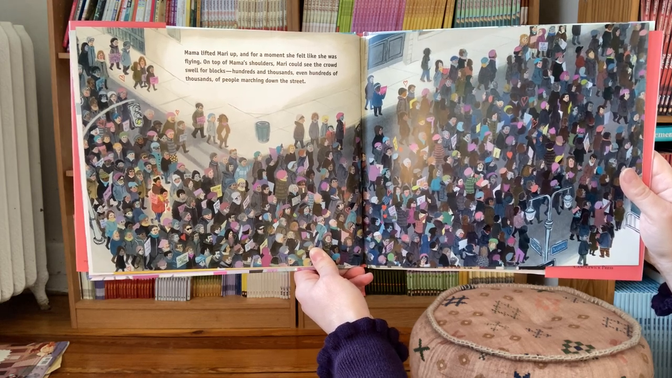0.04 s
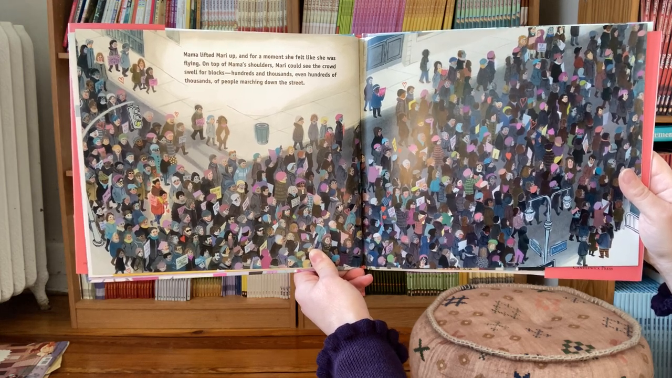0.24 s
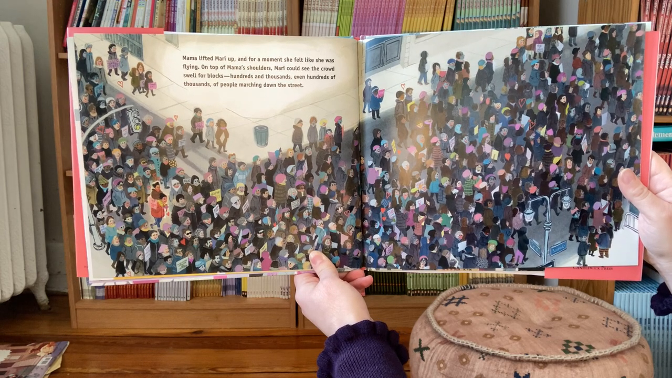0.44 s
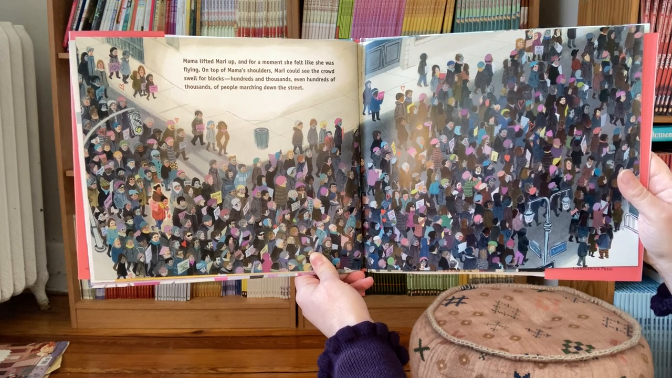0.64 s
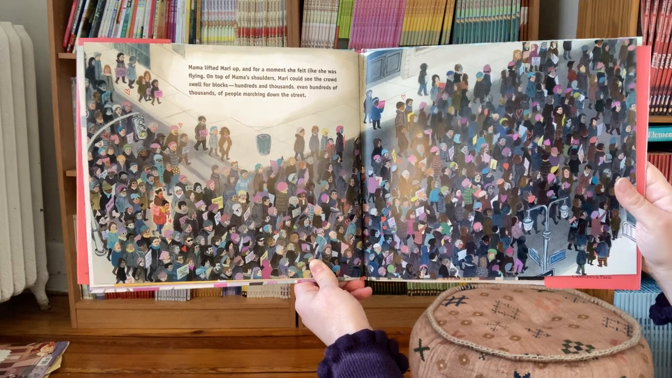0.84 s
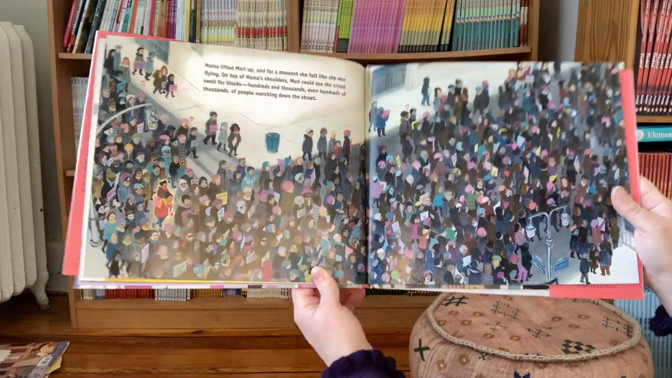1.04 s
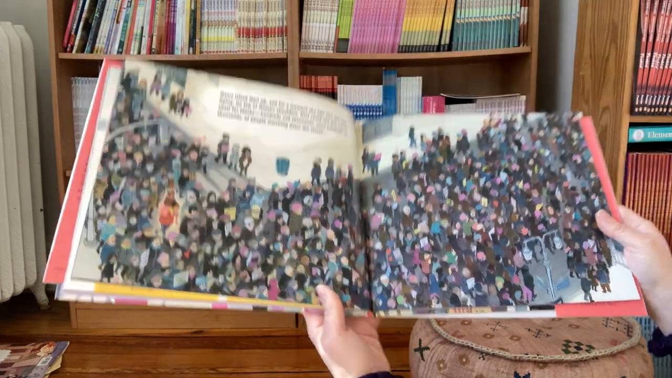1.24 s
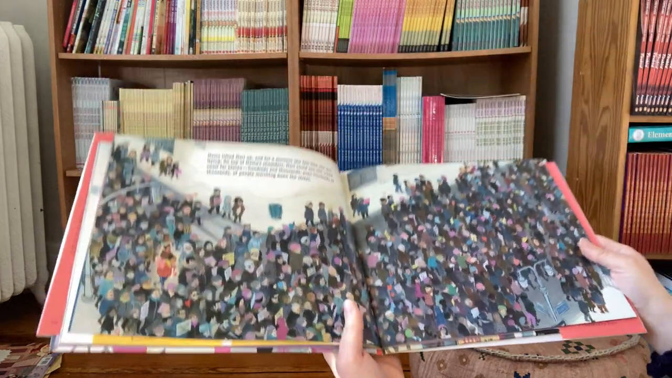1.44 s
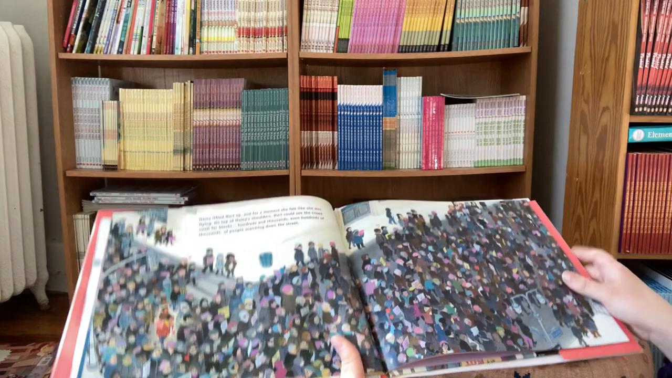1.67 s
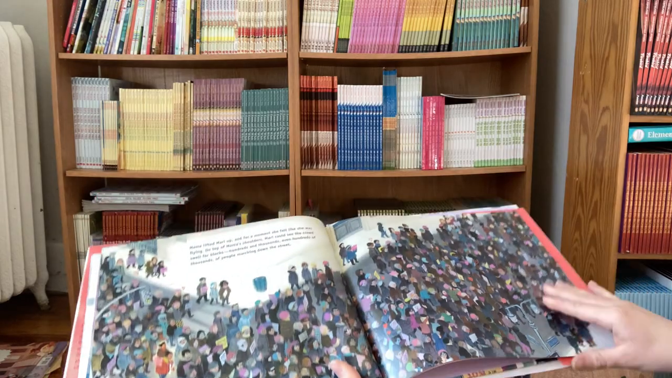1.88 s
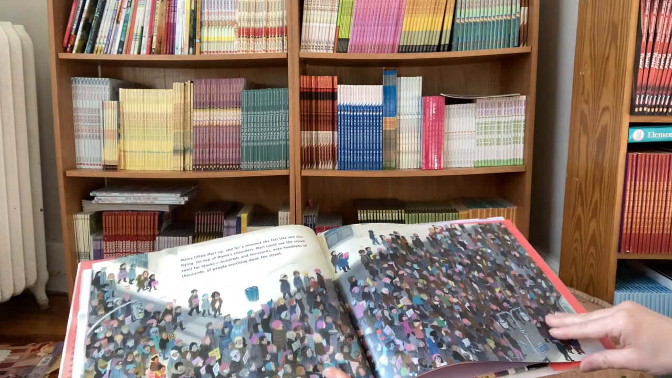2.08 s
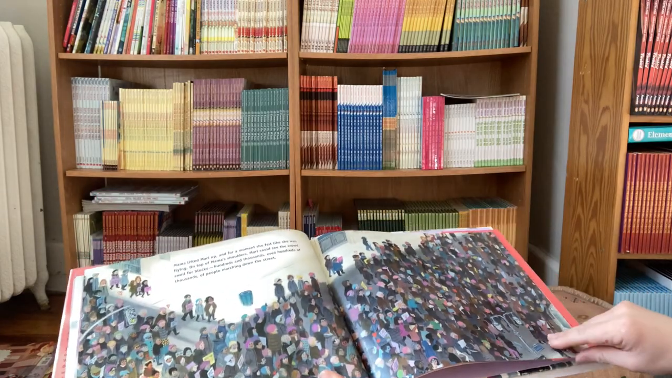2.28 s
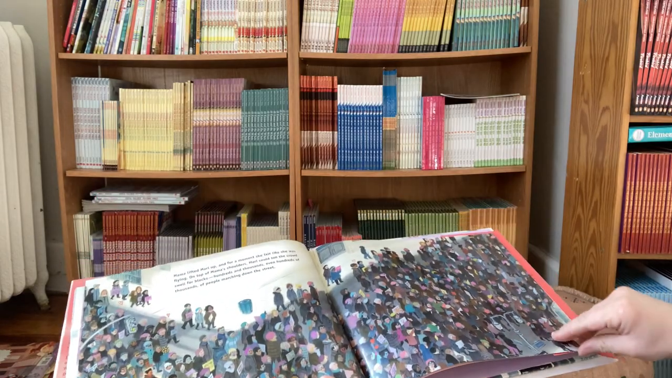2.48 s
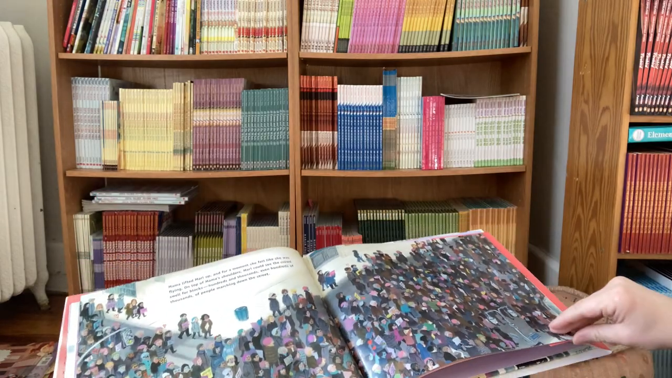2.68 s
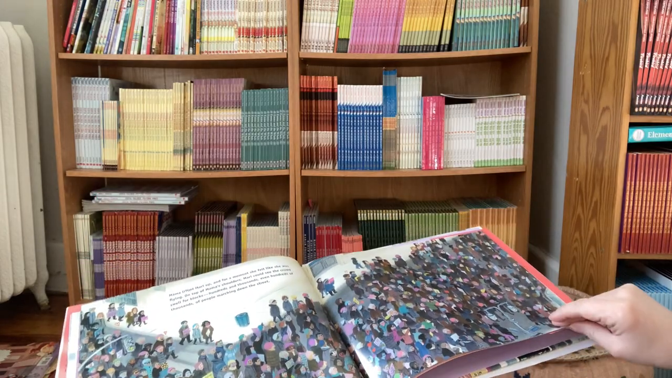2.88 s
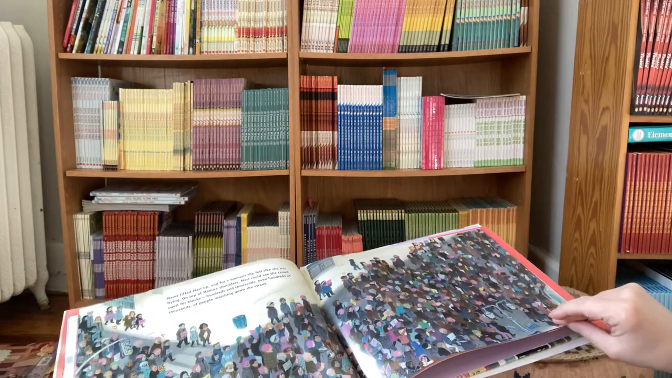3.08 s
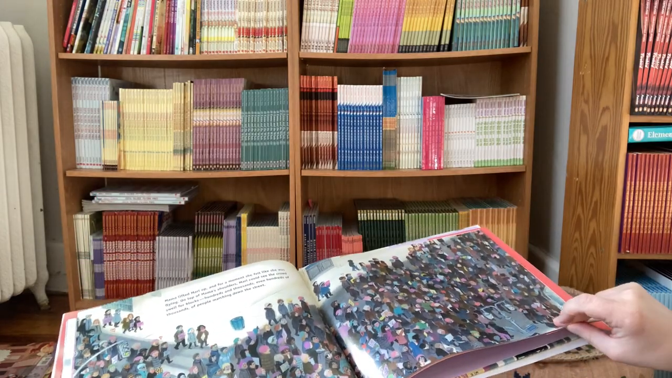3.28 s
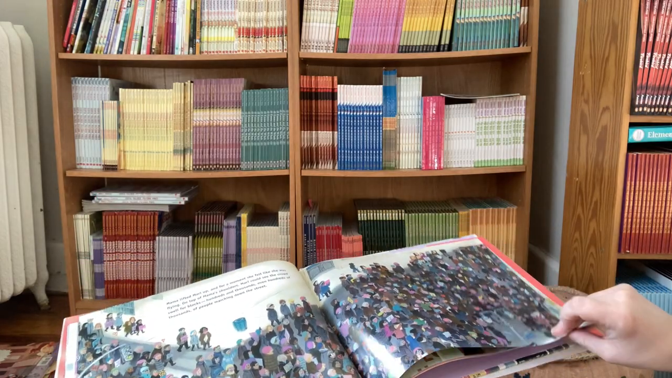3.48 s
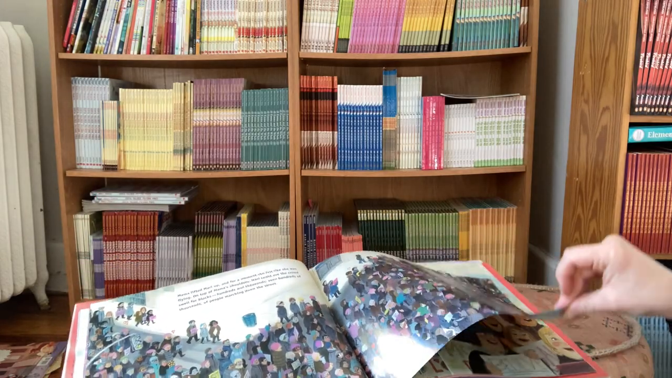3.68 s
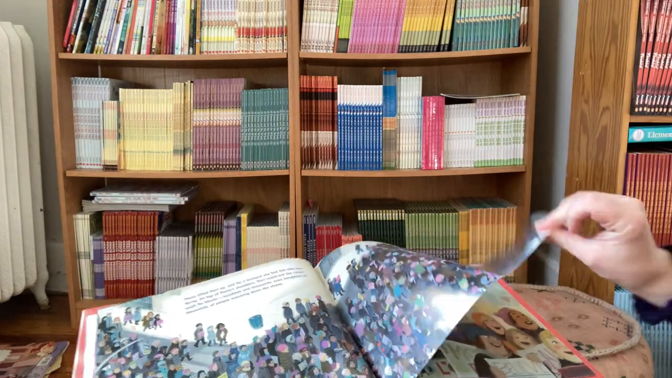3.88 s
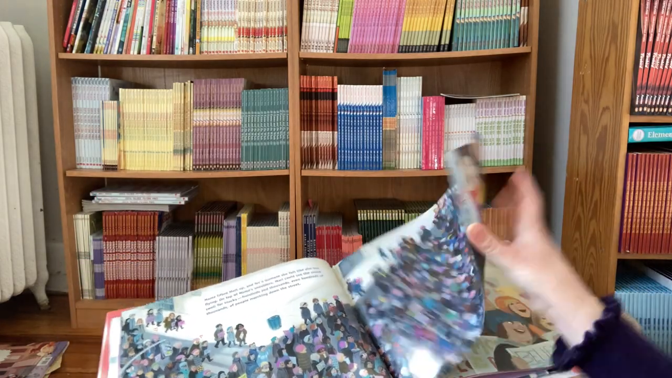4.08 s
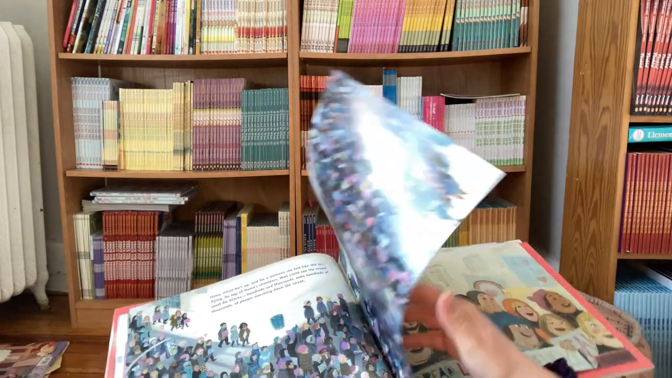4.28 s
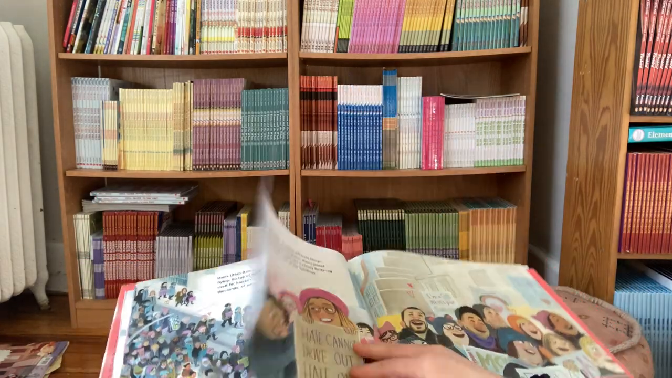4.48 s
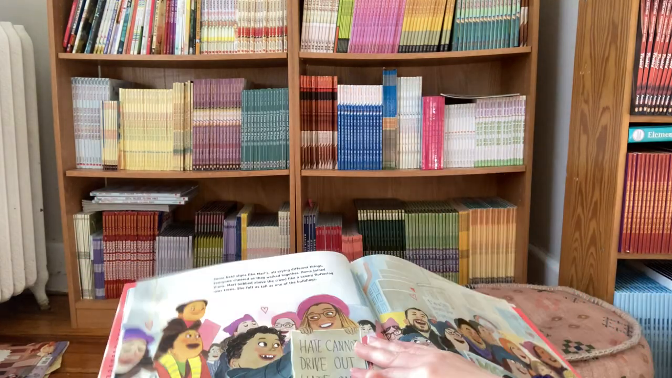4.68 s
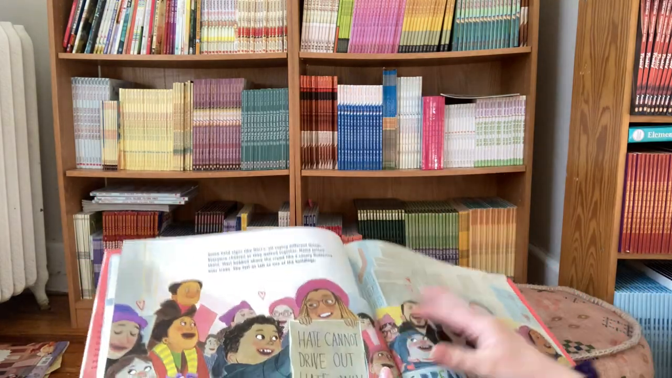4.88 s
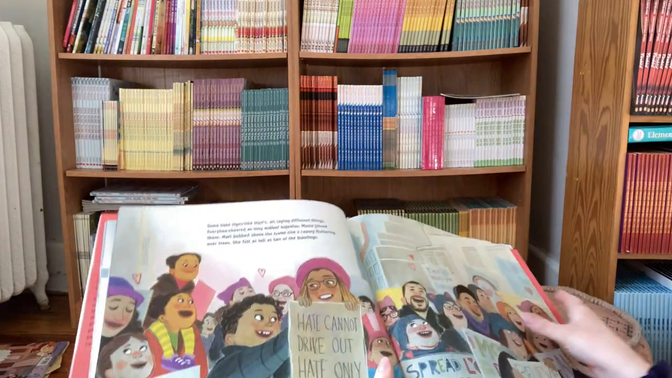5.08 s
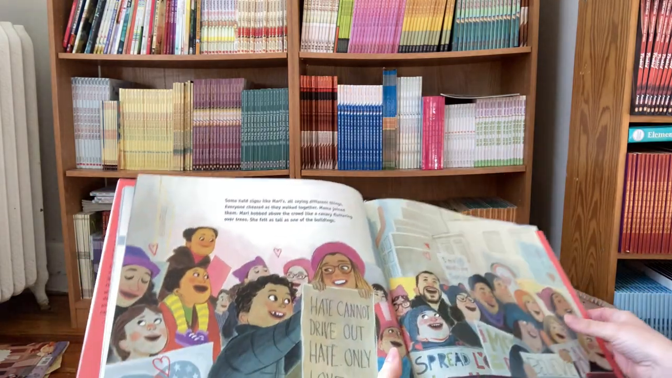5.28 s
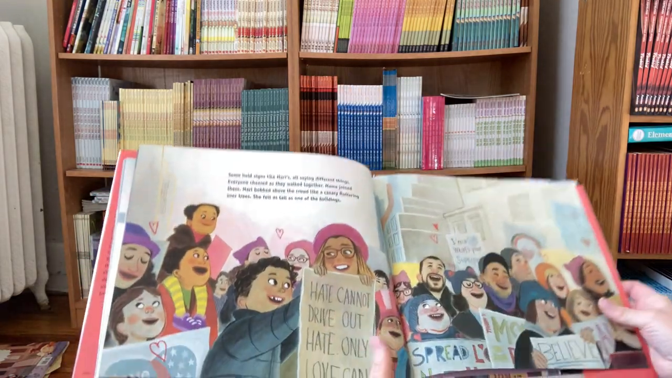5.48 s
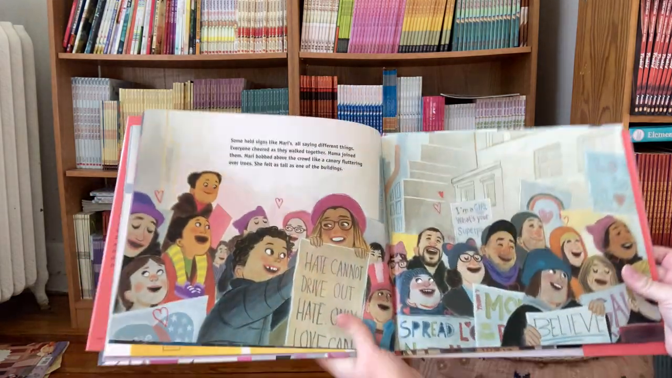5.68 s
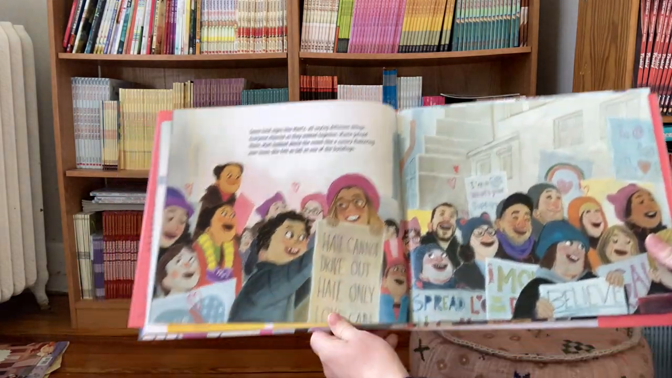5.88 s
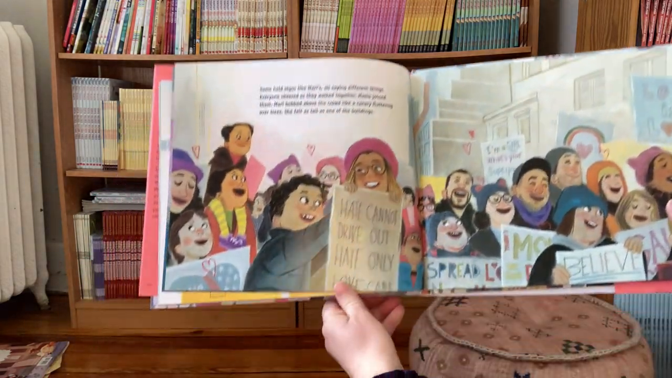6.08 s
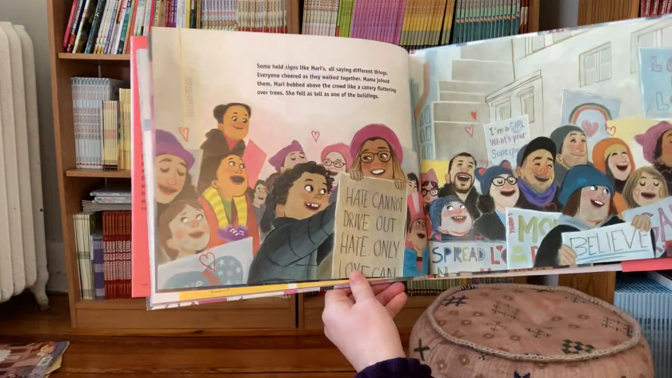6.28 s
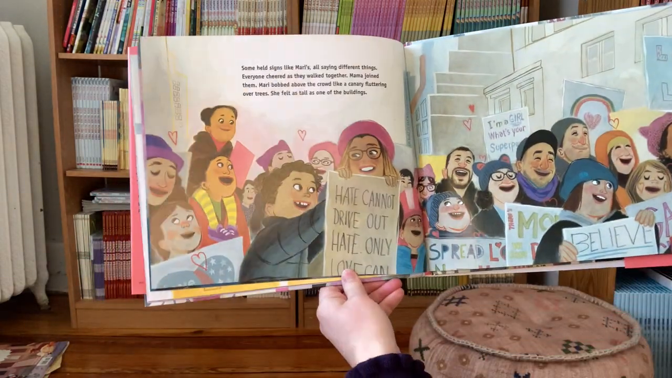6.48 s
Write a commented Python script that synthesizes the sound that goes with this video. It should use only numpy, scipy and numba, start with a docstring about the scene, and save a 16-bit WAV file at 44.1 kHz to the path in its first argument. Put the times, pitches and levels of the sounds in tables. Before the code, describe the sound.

A quiet small room with faint low rumble and slight hiss, close stereo pickup, short soft reverberation. Almost nothing until about 0.9 s, when hands brush paper and cover; small creases click and dull taps touch the board from 1.0 to 2.0 s. Around 2.2-2.4 s a few low-key papery pops and a pat, another pat near 2.6. From 2.9 to 3.3 s a fingertip runs along the page edge in a fine, quickening zip. A crackle at 3.4, then the stiff sheet lifts with pops from 3.7, growing to strong rustling and sharp hollow buckles at 4.0-4.26 s, the loudest around 4.22. A brief airy flutter ends in a crisp slap at 4.55 s. Soft sliding fades; from 5.4 small creaks gather, with a firm double knock on the cover at 5.75. Light brushing and tiny crackles continue to about 6.6 s.

```python
"""A stiff page of a large hardback picture book is turned: the sheet buckles, lands and rings.
Sheet and cover are excited resonators: kinks and slips drive moving band-passes, blows drive decaying modes.
Friction makes the hands' sliding, a quickening pulse train the page edge, and blows the knocks on the cover.
A small room adds time-varying diffuse echoes and a quiet rumble; the sound is stereo."""
import sys
import numpy as np
from scipy import signal
from scipy.fft import rfft, irfft, next_fast_len
from scipy.io import wavfile
from numba import njit

SR = 44100
rng = np.random.default_rng(int(sys.argv[2]) if len(sys.argv) > 2 else 0)


def output_pcm(signal):
    """Save a mono or channel-first signal as 16-bit PCM at the path in sys.argv[1].

    Samples are clipped to [-1, 1] before scaling.
    """
    pcm = np.clip(np.atleast_2d(signal).T, -1, 1) * 32767
    wavfile.write(sys.argv[1], SR, np.round(pcm).astype(np.int16))


N = 288105
T = np.arange(N) / SR


def undb(db):
    """Logarithmic level: decibels to amplitude gain."""
    return 10 ** (np.asarray(db) / 20)


def unit(x):
    """Power normalization: scale to rms 1."""
    return x / np.sqrt(np.mean(x ** 2))


def burst(x):
    """Energy normalization: the energy of a short sound, spread over 20 ms, has rms 1."""
    return x / np.sqrt(np.sum(x ** 2) / (.02 * SR))


def lookup(points, hz):
    """Logarithmic frequency axis: interpolate (frequency [Hz], value) points."""
    f, value = np.transpose(points)
    return np.interp(np.log(np.maximum(hz, 1)), np.log(f), value)


def colour(x, points):
    """Minimum-phase filtering: a causal response made from (frequency [Hz], level [dB]) points."""
    n = 2 * next_fast_len(x.shape[-1])
    level_db = lookup(points, np.fft.rfftfreq(n, 1 / SR))
    cepstrum = irfft(np.log(undb(level_db)))
    # folding the cepstrum onto positive time makes the filter causal
    cepstrum[1:n // 2] *= 2
    cepstrum[n // 2 + 1:] = 0
    response = np.exp(rfft(cepstrum))
    return irfft(rfft(x, n) * response)[..., :x.shape[-1]]


@njit
def resonate(x, hz, damping):
    """Resonance of a changing body: a state-variable band-pass whose centre moves."""
    y, band, low = np.empty(len(x)), 0., 0.
    for i in range(len(x)):
        g = np.tan(np.pi * min(hz[i] / SR, .45))
        v = (band + g * (x[i] - low)) / (1 + g * (g + damping))
        band, low, y[i] = 2 * v - band, low + 2 * g * v, damping * v
    return y


def modes(table, t):
    """Modal superposition: decaying (frequency [Hz], level [dB], t60 [s]) modes, detuned at every blow."""
    detune = 1 + .008 * rng.standard_normal(len(table))
    ring = 0
    for (hz, db, t60), factor in zip(table, detune):
        decay = np.exp(-np.log(1000) * t / t60)
        ring = ring + undb(db) * decay * np.sin(2 * np.pi * hz * factor * t)
    return ring


def walk(rate):
    """Slow random modulation: a wander of rms 1 through `rate` random knots per second."""
    knots = rng.standard_normal(int(N / SR * rate) + 2)
    return unit(np.interp(T * rate, np.arange(len(knots)), knots))


def slips(size, rate, spread_db):
    """Stick and slip of paper fibres: random clicks of uneven strength, `rate` per second on average."""
    chance, strength = rng.random(size), rng.standard_normal(size)
    push = rng.choice([-1, 1], size)
    return unit((chance < rate / SR) * push * undb(spread_db * np.clip(strength, -2, 2)))


def add(track, s, x):
    """Superposition: mix x into the track at time s."""
    i = int(s * SR)
    track[i:i + len(x)] += x[:N - i]


def diffuse(pair, apart_hz):
    """Diffuse-field coherence: two unrelated signals become channels alike in bass, different in treble."""
    mid, side = pair
    side = signal.sosfilt(signal.butter(1, apart_hz, "high", fs=SR, output="sos"), side)
    return np.array([mid + side, mid - side])


# spectrum of the quiet room: (frequency [Hz], level [dB])
QUIET_COLOUR = [(15, -60), (25, -21.5), (58, -2.5), (80, -1.5), (108, -11.5), (123, -8), (212, -22),
                (301, -18.5), (335, -19), (545, -27.5), (677, -30.5), (988, -34), (5730, -50), (8830, -44),
                (16000, -59.5)]
QUIET_DB = -66


def quiet_room():
    """Diffuse background noise: the low rumble of the house with a faint hiss, wandering in level."""
    air = diffuse(rng.standard_normal((2, N)), apart_hz=420)
    air = colour(air, QUIET_COLOUR)
    air = signal.sosfilt(signal.butter(6, 35, "high", fs=SR, output="sos"), air)
    return unit(air) * undb(QUIET_DB + .6 * walk(5))


# reverberation time of the room: (frequency [Hz], t60 [s])
ROOM_T60 = [(100, 0.69), (300, 0.55), (800, 0.38), (2000, 0.31), (5000, 0.3), (14000, 0.23)]
# spectrum of what the room returns: (frequency [Hz], level [dB])
ROOM_COLOUR = [(60, -1.5), (300, 2), (900, -1.5), (3500, 4.5), (6500, -0.5), (10000, -11.5), (15000, -18)]
NEW_PATHS_S = .22  # the book keeps moving, so its echoes take new paths this often


def room(x, early_db=-8.5, early_s=0.0045, tail_db=-6, left_db=-1.0, size=24000):
    """Reverberant decay: floor and shelves scatter the moving book's sound, which then dies away."""
    t, hop = np.arange(size) / SR, int(NEW_PATHS_S * SR)
    x, out = colour(x, ROOM_COLOUR), np.zeros((2, N))
    for centre in range(0, N + hop, hop):
        # late echoes: noise decaying at its own rate in each frequency band
        f, frame_s, cells = signal.stft(rng.standard_normal((2, size)), SR)
        decay = np.exp(-np.log(1000) * frame_s / lookup(ROOM_T60, f)[:, None])
        tail = signal.istft(cells * decay)[1][:, :size]
        tail = tail * np.clip((t - .004) / 0.0064, 0, 1)
        early = rng.standard_normal((2, size)) * np.exp(-t / early_s) * (t > .002)
        response = (undb(early_db) * unit(early) + undb(tail_db) * unit(tail)) / np.sqrt(2 * size)
        # crossfade from one set of paths to the next
        near = np.arange(max(centre - hop, 0), min(centre + hop, N))
        part = x[near] * np.cos(np.pi / 2 * (near - centre) / hop)
        for track, paths in zip(out, response):
            add(track, near[0] / SR, signal.fftconvolve(part, paths))
    return diffuse(out, apart_hz=298) * undb(np.array([[left_db], [-left_db]]) / 2)


MIRROR_S, MIRROR_DB, MIRROR_HZ = .00138, -17, (600, 2880)  # delay [s], gain [dB], band edges [Hz]


def mirrored(x):
    """Specular reflection: the sound and its delayed, band-limited bounce off the open book."""
    bounce = signal.sosfilt(signal.butter(1, MIRROR_HZ, "band", fs=SR, output="sos"), x)
    return x + undb(MIRROR_DB) * np.interp(T - MIRROR_S, T, bounce, left=0)


# phase by which the left port leads the right one: (frequency [Hz], phase [rad])
PORT_PHASE = [(20, 0.9), (150, 0), (400, -0.85), (1000, -0.95), (2000, -1), (3190, -2.5), (3790, -5),
              (4500, -6.5), (6500, -9.5), (8700, -6.5), (11500, -3), (13600, -0.3), (16000, 3)]


def ports(x, left_db=-4.0, shadow_hz=350):
    """Interchannel level and phase: above the bass the body leans right, each register with its own lag."""
    f = np.fft.rfftfreq(2 * N, 1 / SR)
    body = 1 / (1 + (f / 5900) ** 16)  # the lean vanishes in the high treble
    above_bass = f ** 2 / (f ** 2 + shadow_hz ** 2)
    lean = undb(left_db * body * above_bass / 2)
    lead = np.exp(1j * lookup(PORT_PHASE, f))
    return irfft(rfft(x, 2 * N) * np.array([lean * lead, 1 / lean]))[:, :N]


# fingers and spine knock on the cover: (time [s], level [dB], board ring [dB])
KNOCKS = [(1.086, -65.5, 0.5), (1.1321, -56, -5.5), (2.366, -53.5, -9), (2.594, -54.5, -8.5),
          (2.85, -63.5, -13), (2.871, -62.5, 3.5), (2.887, -61.5, 7), (3.167, -56.5, -45), (5.7418, -60, 1),
          (5.7515, -43, 5), (5.7633, -45, 4.5)]
# modes of the cover board: (frequency [Hz], level [dB], t60 [s])
BOARD = [(1363, 16, 0.0355), (1434, 9.5, 0.028), (3300, 3.5, 0.015), (3800, 11, 0.0081), (4170, 4.5, 0.014)]
# soft fingertip on the stack of pages: (frequency [Hz], level [dB])
PAD_COLOUR = [(200, 5.5), (500, 3), (900, 15.5), (1500, 2.5), (2400, -20), (4500, -22), (9000, -77)]
# hollow thump of the book: (frequency [Hz], level [dB])
THUMP_COLOUR = [(40, -2), (90, -5), (165, 3.5), (250, -11.5), (330, 0.5), (500, 1), (750, -17), (1400, -21)]
# dry crackle of paper, also in creases and buckles: (frequency [Hz], level [dB])
CRACKLE_COLOUR = [(600, -27), (1500, 9.5), (2500, 17), (4500, 8), (6500, 7), (9000, 2.5), (13000, -6),
                  (16000, -6.5)]
# tick and thump grow with the ring: level at 0 dB ring [dB], change per dB of ring [dB]
TICK_DB, TICK_PER_RING, THUMP_DB, THUMP_PER_RING = -10.5, 0.81, -7, 1


def knocks(tick_s=0.0012, pad_s=0.0078, size=6000):
    """Impact excitation: a dull pat on the pages rings the board, with a dry tick and the book's thump."""
    out, t = np.zeros(N), np.arange(size) / SR
    for s, db, ring_db in KNOCKS:
        tick_db = TICK_DB + TICK_PER_RING * ring_db
        thump_db = THUMP_DB + THUMP_PER_RING * ring_db
        ring = modes(BOARD, t)
        pat = colour(rng.standard_normal(size) * np.exp(-t / pad_s), PAD_COLOUR)
        tick = colour(rng.standard_normal(size) * np.exp(-t / tick_s), CRACKLE_COLOUR)
        thump = colour(signal.unit_impulse(size), THUMP_COLOUR)
        parts = burst(pat) + undb(ring_db) * burst(ring)
        parts += undb(tick_db) * burst(tick) + undb(thump_db) * burst(thump)
        add(out, s, undb(db) * parts)
    return out


# a fingertip runs along the edge of the page: (time [s], level [dB])
EDGE = [(2.86, -84), (2.89, -57), (2.925, -54), (2.985, -52.5), (3.005, -58), (3.025, -48), (3.115, -48),
        (3.19, -53), (3.3, -73.5)]
# spectrum of the edge's catches: (frequency [Hz], level [dB])
EDGE_COLOUR = [(500, -16), (900, 2), (1150, -6), (1500, 3), (2000, -3), (4800, -1), (7000, -5), (9500, -3),
               (12300, 6), (14500, 1), (15700, -8)]
EDGE_RATE, EDGE_DOUBLING_S = 85, 0.14  # first catches per second, time in which the rate doubles [s]


def page_edge(slip_s=0.0004, jitter=0.45, uneven_db=2):
    """Stick-slip oscillation: the cut edge zips in a quickening train of catches, each a spray of clicks."""
    start, end = EDGE[0][0], EDGE[-1][0]
    since = np.clip(T, start, end) - start
    rate = EDGE_RATE * 2 ** (since / EDGE_DOUBLING_S) * np.exp(jitter * walk(90))
    on = (T > start) & (T < end)
    # a catch falls at every whole cycle of the accumulated rate
    catches = np.diff(np.floor(np.cumsum(rate / SR)), prepend=0)
    # the faster the catches come, the less strain each one releases
    catches = catches * undb(uneven_db * rng.standard_normal(N)) / np.sqrt(rate)
    strain = signal.lfilter([1], [1, -np.exp(-1 / (slip_s * SR))], catches)
    spray = strain * rng.standard_normal(N)
    out = np.zeros(N)
    out[on] = unit(colour(spray[on], EDGE_COLOUR)) * undb(np.interp(T[on], *np.transpose(EDGE)))
    return out


# skin and paper slide over each other: (start [s], length [s], swell [s], rub level [dB],
# hiss level [dB], sheet level [dB], sheet pitch [Hz])
STROKES = [ (0.859, 0.2, 0.022, -81.5, -80.5, -91, 1610), (0.958, 0.19, 0.003, -71.5, -61, -73, 3020),
           (1.079, 0.23, 0.034, -71.5, -65, -67, 2460), (1.223, .17, 0.059, -74, -58.5, -63.5, 1490),
           (1.331, 0.21, 0.04, -73, -74, -71, 1500), (1.481, 0.25, 0.029, -69.5, -70.5, -74, 1280),
           (1.626, 0.16, 0.0041, -64, -62, -66, 3460), (1.826, 0.13, 0.003, -69, -62.5, -69.5, 3460),
           (1.899, 0.18, 0.078, -77, -65, -77, 3440), (1.997, 0.5, 0.046, -75.5, -75, -84, 1680),
           (2.464, 0.3, 0.031, -74, -79.5, -83, 1810), (2.697, 0.22, 0.087, -59.5, -69, -66, 1390),
           (2.872, 0.53, 0.02, -62, -62, -61.5, 1490), (3.385, 0.39, 0.0063, -61, -57, -55.5, 2250),
           (3.913, 0.36, 0.0017, -55, -52, -49.5, 1730), (4.122, 0.18, 0.0057, -39.5, -46, -48, 2610),
           (4.293, 0.29, 0.039, -60, -53.5, -56, 1860), (4.553, 0.18, 0.0075, -62, -64.5, -61.5, 2300),
           (4.66, 0.29, 0.16, -67.5, -56.5, -60.5, 2700), (4.904, 0.23, 0.0011, -73, -53, -69.5, 2950),
           (5.165, 0.72, 0.0046, -87, -73, -79, 4040), (5.38, 0.45, 0.11, -63.5, -63.5, -63.5, 1940),
           (5.631, 0.27, 0.052, -60, -55, -80, 1300), (5.781, 0.19, 0.08, -62, -56.5, -67, 2130),
           (5.997, 0.14, 0.02, -64.5, -59, -66, 2010), (6.096, 0.13, 0.051, -65.5, -54.5, -63, 2330),
           (6.166, 0.15, 0.032, -64, -59.5, -62, 3770), (6.198, 0.42, 0.034, -60.5, -73, -61.5, 2000)]
# rub heard through the book: (frequency [Hz], level [dB])
RUB_COLOUR = [(120, -34), (200, 2.5), (310, 4.5), (430, 0), (650, 1), (870, 7.5), (1170, 0.5), (1450, 4),
              (1780, -11.5), (2150, -1), (3220, -16.5), (4810, -14), (6860, -45.5), (8000, -35),
              (10400, -38.5), (17600, -120)]
# hiss of the paper's grain: (frequency [Hz], level [dB])
HISS_COLOUR = [(1500, -10), (3000, -11.5), (4800, -9), (6800, -2), (9000, 3), (13500, 1.5), (15500, -1)]
FADE_SHARE = 0.81  # the hand slows to rest over this share of each stroke
# the lighter the touch (more hiss than rub), the brighter the hiss:
# tilt at equal levels [dB per octave], its change per dB of lightness
HISS_TILT_DB, TILT_PER_LIGHTNESS = -7.5, 0.41
CREASES_PER_S, CREASE_DB = 110, -15  # creases ticking in a stroke: mean rate [1/s], level against the rub [dB]


def sliding(grip_db=1.1, body_db=1.5, wander=0.21):
    """Friction noise: stick and slip sounds through book and sheet; fine grain hisses and creases tick."""
    out = np.zeros(N)
    grip, bend = grip_db * walk(55), np.exp(wander * walk(12))
    creases = unit(colour(slips(N, rate=CREASES_PER_S, spread_db=11.5), CRACKLE_COLOUR))
    damping = .85
    for s, length, swell, rub_db, hiss_db, sheet_db, sheet_hz in STROKES:
        fade = FADE_SHARE * length
        tilt = HISS_TILT_DB + TILT_PER_LIGHTNESS * (hiss_db - rub_db)
        on = (T >= s) & (T < s + length)
        ramp = np.clip(np.minimum((T[on] - s) / swell, (s + length - T[on]) / fade), 0, 1)
        contact = np.sin(np.pi / 2 * ramp) ** 2
        catches = slips(SR, rate=1700, spread_db=4.5)[:on.sum()]
        grain = slips(SR, rate=8800, spread_db=4.5)[:on.sum()]
        # the sheet's broad resonance shifts as it bends under the hand
        pitch = sheet_hz * bend[on]
        sheet = resonate(resonate(catches, pitch, damping), pitch, damping)
        body = undb(body_db) * unit(colour(catches, RUB_COLOUR)) + undb(CREASE_DB) * creases[on]
        rub = undb(rub_db) * body + undb(sheet_db) * unit(sheet)
        tilted = [(f, db + tilt * np.log2(f)) for f, db in HISS_COLOUR]
        hiss = unit(colour(grain, tilted))
        # grip moves the hiss more than the rub
        add(out, s, contact * (rub * undb(grip[on]) + hiss * undb(hiss_db + 1.8 * grip[on])))
    return out


# the sheet buckles or a crease clicks: (time [s], level [dB], pitch [Hz], swell [s], fade [s],
# crackle [dB], resonance width / pitch [1])
BUCKLES = [ (1.0124, -55, 1020, 0.0003, 0.006, -8.5, 1.2), (1.231, -55, 1600, 0.0021, 0.006, -9, 1.7),
           (1.243, -53, 1220, .002, 0.014, -10.5, 0.57), (1.288, -58.5, 1390, .001, 0.035, -3.5, 0.85),
           (1.556, -67, 1200, .0005, 0.0034, -17, 0.88), (1.599, -75.5, 2000, .0004, 0.0011, 10.5, 1.6),
           (1.6328, -59.5, 3600, 0.00064, 0.0043, -12, 1.3), (1.637, -63, 895, 0.0013, 0.0025, -9, 1.4),
           (1.678, -63.5, 890, 0.0011, 0.017, -5, 0.98), (1.723, -64.5, 940, 0.00085, 0.007, -8, 1.3),
           (2.034, -64.5, 1370, 0.0003, .002, -9.5, 1.06), (2.226, -50.5, 1920, 0.003, 0.027, -20, 0.87),
           (2.246, -51.5, 1870, 0.0094, 0.021, -19.5, 1.74), (2.278, -47.5, 2100, .004, 0.013, -14, 1.58),
           (2.332, -52.5, 1240, 0.0017, 0.01, -19, 2.2), (2.347, -56.5, 1050, 0.0012, 0.004, -12, 0.8),
           (2.463, -77.5, 1860, .0005, 0.0025, -6, 2), (2.489, -68, 1490, 0.0011, 0.0053, -11, 2.3),
           (2.721, -69, 1800, .0004, .002, -3, 1.4), (2.737, -69.5, 1500, .0004, .002, -4, 1.2),
           (2.767, -63.5, 1490, .0004, .002, -4, 1.2), (2.791, -57.5, 910, 0.00074, 0.01, -11.5, 0.84),
           (2.804, -53.5, 746, 0.0022, 0.027, -30, 1.6), (3.379, -46.5, 1130, 0.0015, 0.013, 6, 1.74),
           (3.7011, -46.5, 910, 0.0004, 0.003, -7, 1.05), (3.7095, -46.5, 930, 0.00028, 0.0029, -7, 1.8),
           (3.716, -48, 945, 0.001, 0.04, -4, 1.25), (3.824, -42, 1470, .0008, .003, -26, 1.65),
           (3.83, -41, 1340, 0.0014, 0.01, -38, 1.54), (3.8447, -42.5, 1400, .002, 0.0036, -39.5, 1.6),
           (3.856, -43.5, 900, .003, .02, -19.5, 1.1), (3.916, -46.5, 1930, 0.00095, 0.0044, -3.5, 1.23),
           (3.9595, -45, 1280, 0.0005, 0.0043, -2.5, 1.5), (4.001, -46, 1730, 0.0073, 0.004, 0.5, 0.77),
           (4.0112, -36, 1950, 0.0013, 0.0025, -6, 0.73), (4.017, -37, 1700, 0.00061, 0.003, -4.5, 1.15),
           (4.021, -35, 1230, 0.003, 0.0061, -22, 0.72), (4.034, -42, 1210, 0.0011, 0.013, -17, 1.8),
           (4.103, -62, 3800, .0005, .003, -6, 1.3), (4.1316, -33.5, 1040, 0.00013, 0.0027, -11.5, 2.9),
           (4.1368, -36, 666, 0.00033, 0.0013, -13, 1.06), (4.148, -37, 2400, 0.01, 0.018, -2, 1.1),
           (4.216, -33, 1200, 0.0003, 0.003, -34, 1), (4.2229, -26.5, 1580, 0.0022, 0.002, -27.5, 0.68),
           (4.228, -28.5, 1448, 0.0008, 0.002, -32.5, 0.78), (4.2335, -34.5, 1040, .0005, .002, -30, 0.63),
           (4.2383, -29.5, 880, 0.0015, 0.004, -34.5, 0.88), (4.257, -39, 950, .001, .008, -27, 0.73),
           (5.469, -54, 1000, 0.00081, 0.0045, -33, 0.77), (5.477, -59, 1390, 0.0013, 0.0035, -16, 1.7),
           (5.527, -58.5, 1160, 0.0022, 0.0027, -8, 0.34), (5.535, -59.5, 800, 0.00029, 0.0013, -4.5, 1.4),
           (5.567, -56, 1150, .0008, 0.0021, -12, 0.3), (5.5758, -54, 1300, 0.00024, 0.00097, 1, 1.9),
           (5.582, -53.5, 1150, 0.00033, 0.0025, -1, 1.9), (5.652, -57.5, 1400, 0.00055, 0.0044, -14, 1.3),
           (5.684, -51.5, 1130, 0.012, 0.0035, -8, 0.26), (5.692, -47.5, 1250, 0.00034, 0.0037, -8.5, 0.39),
           (5.6989, -47.5, 1400, 0.001, 0.0044, -16, 0.51), (6.025, -60.5, 1110, 0.0083, 0.0087, -5, 0.56),
           (6.108, -58.5, 910, 0.0014, 0.0065, -4.5, 1.3), (6.216, -58, 1300, .001, 0.0065, 3.5, 2),
           (6.238, -56.5, 1300, 0.00092, 0.003, -1, 2.1)]
# air pumped by the sheet and thump of the whole book: (frequency [Hz], level [dB])
PUFF_COLOUR = [(40, -14.5), (100, -4.5), (170, -2), (230, -6), (315, 1.5), (450, -1), (700, -10),
               (1400, -50.5)]
# a wider fold sounds lower and pumps more air: puff level at 1 kHz [dB], its change with pitch
PUFF_DB, PUFF_DB_PER_OCTAVE = -10.5, -5.5


def buckles(glide=0.29, glide_s=0.0077, snap=2.1, rate=2600, size=14000):
    """Snap-through buckling: a kink's flurry of slips snaps, and the ring falls as the sheet relaxes."""
    out, t = np.zeros(N), np.arange(size) / SR - .06  # the snap falls at t = 0
    for s, db, hz, swell, fade, crackle_db, width in BUCKLES:
        strain = np.exp(-np.abs(t) / np.where(t < 0, swell, fade))
        force = strain * slips(size, rate, spread_db=3)
        force[np.argmin(np.abs(t))] += 2 * snap
        pitch = hz * np.exp(-glide * np.tanh(t / glide_s))
        ring = force
        for _ in range(3):
            ring = resonate(ring, pitch, width)
        crackle = colour(force + strain * slips(size, rate=900, spread_db=5), CRACKLE_COLOUR)
        puff = colour(force, PUFF_COLOUR)
        puff_db = PUFF_DB + PUFF_DB_PER_OCTAVE * np.log2(hz / 1000)
        parts = burst(ring) + undb(crackle_db) * burst(crackle) + undb(puff_db) * burst(puff)
        add(out, s + t[0], undb(db) * parts)
    return out


# the turned page settles; its ring falls as the air under it is squeezed out:
# (time [s], level [dB], pitch [Hz])
LANDING = [(4.48, -64, 2155), (4.525, -49, 2100), (4.536, -42, 2100), (4.552, -28.5, 2100),
           (4.553, -25.5, 1450), (4.559, -36.5, 1194), (4.564, -48.5, 700), (4.572, -70, 503)]
# crack of the page on the stack: (frequency [Hz], level [dB])
SLAP_COLOUR = [(300, -13.5), (1500, -8), (2300, 11), (3200, 2), (4000, 0), (5200, -0.5), (6500, -10),
               (9500, -5), (15000, -27.5)]
# modes of the flat page: (frequency [Hz], level [dB], t60 [s])
PAGE = [(1404, -10.5, 0.042), (2123, 3.5, 0.0294), (3200, -9, .09), (3320, -17.5, 0.12)]
SLAP_S, SLAP_DB = 4.5515, -37  # the page meets the stack: time [s], level [dB]


def landing(width=0.67, hiss_db=-14, puff_db=-17, crack_s=0.0021, fibres_db=1, ring_db=-3, size=12000):
    """Squeeze-film and impact: the page glides on a cushion of air, slaps the stack and rings briefly."""
    when, db, hz = np.transpose(LANDING)
    flutter = slips(N, rate=6000, spread_db=2)
    pitch, t = np.interp(T, when, hz), np.arange(size) / SR
    cushion = resonate(resonate(flutter, pitch, width), pitch, width)
    cushion = unit(cushion / np.sqrt(pitch))
    air = undb(hiss_db) * unit(colour(flutter, HISS_COLOUR))
    air += undb(puff_db) * unit(colour(flutter, PUFF_COLOUR))
    out = (cushion + air) * undb(np.interp(T, when, db)) * (T > when[0]) * (T < when[-1])
    fibres = burst(rng.standard_normal(size) * np.exp(-t / crack_s))
    crack = colour(burst(signal.unit_impulse(size)) + undb(fibres_db) * fibres, SLAP_COLOUR)
    add(out, SLAP_S, undb(SLAP_DB) * (burst(crack) + undb(ring_db) * burst(modes(PAGE, t))))
    return out


# how much of each source the room returns; cover and flat page face the microphone [dB]
BUCKLE_ROOM_DB, KNOCK_ROOM_DB, LANDING_ROOM_DB = -1.5, -5.5, -3


def scene():
    """Superposition of fields: direct sound, reverberation and background noise add up."""
    taps, hands = knocks(), sliding() + page_edge()
    folds, slap = buckles(), landing()
    scattered = undb(BUCKLE_ROOM_DB) * folds + undb(KNOCK_ROOM_DB) * taps
    scattered += undb(LANDING_ROOM_DB) * slap + hands
    direct = mirrored(folds + hands) + taps + slap
    return ports(direct) + room(scattered) + quiet_room()


TOP_HZ = 16000


def record(dry):
    """Band limitation: the recorder cuts the top with a steep elliptic low-pass."""
    return signal.sosfilt(signal.ellip(10, .2, 70, TOP_HZ, fs=SR, output="sos"), dry)


dry = scene()
out = record(dry)
output_pcm(out)
```